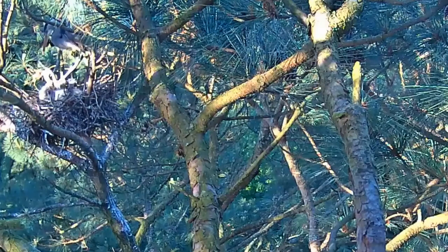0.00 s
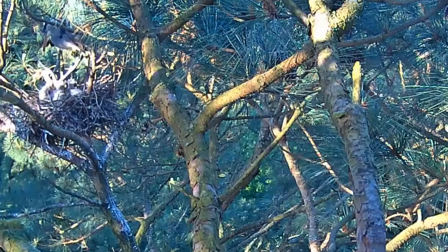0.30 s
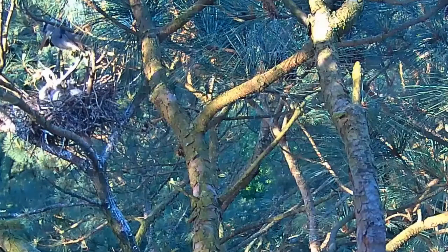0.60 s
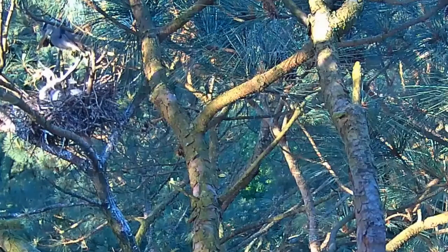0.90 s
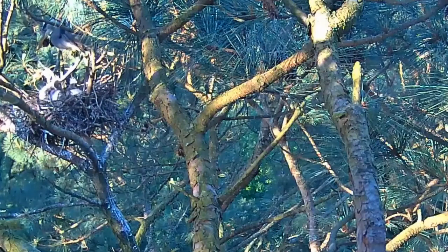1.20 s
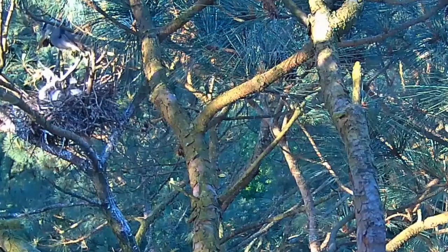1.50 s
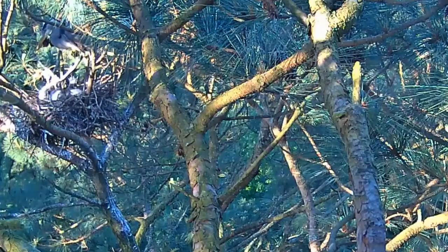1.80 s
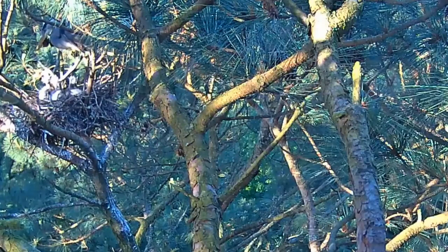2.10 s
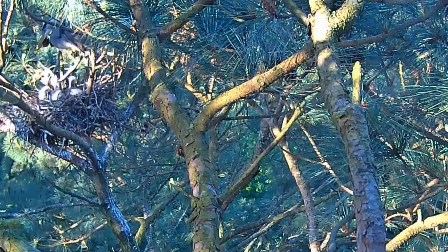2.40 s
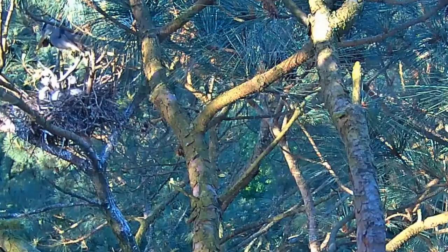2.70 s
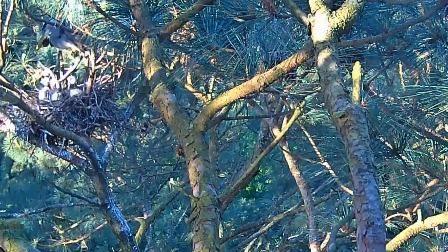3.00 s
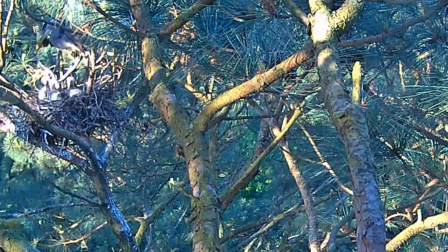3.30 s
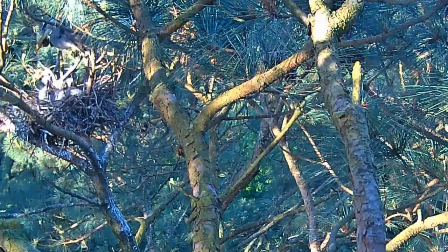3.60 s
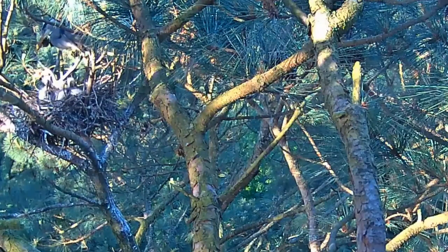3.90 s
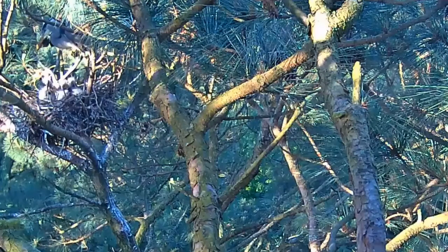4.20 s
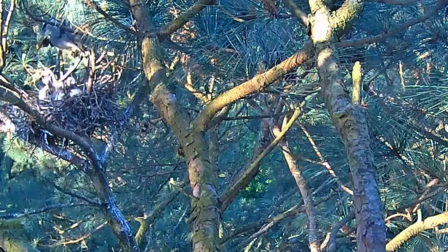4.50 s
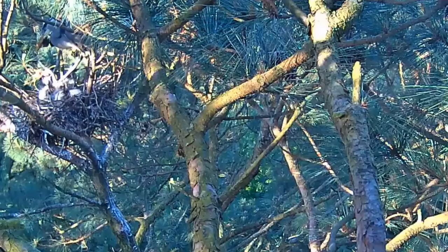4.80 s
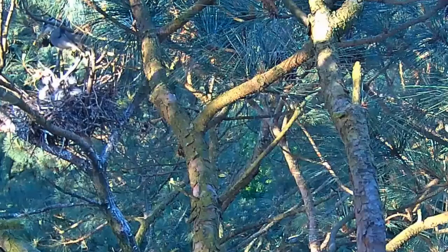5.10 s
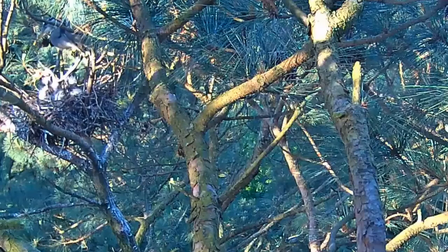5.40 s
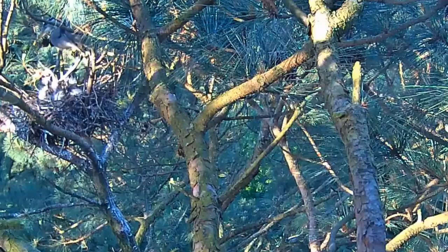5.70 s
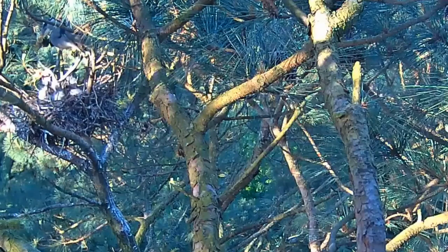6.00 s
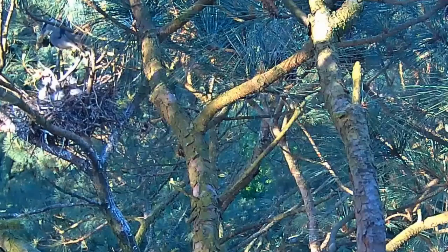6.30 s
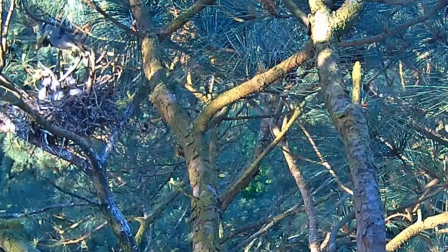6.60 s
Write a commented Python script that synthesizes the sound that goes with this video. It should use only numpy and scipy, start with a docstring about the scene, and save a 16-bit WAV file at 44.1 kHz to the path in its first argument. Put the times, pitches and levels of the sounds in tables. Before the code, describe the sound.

Heron chicks give short, dry clacking calls in loose runs from a nest high in a pine wood, heard from the ground below. A songbird whistles a quick, repeating phrase at the start and again near the end, and in between other birds whistle and chatter faintly from farther off. A steady low hum, distant traffic and soft air in the needles lie underneath.

```python
"""A pine wood, microphone on the ground below a heron nest. High overhead the chicks give short, dry
"kek" calls: rattles of syrinx pulses ringing in the throat. A songbird whistles two phrases of pure
slurs that scatter among the trunks; other birds call from farther off, half lost in their echoes.
Under it all lie distant traffic, one far car passing, an engine and machinery drones, air in the pines
and a low mains hum. The recorder adds faint, glassy high tones to the whistles and a ring to the keks."""
import sys
import numpy as np
from scipy import signal
from scipy.fft import rfft, irfft, next_fast_len
from scipy.io import wavfile
from scipy.ndimage import uniform_filter1d, map_coordinates

SR = 44100
rng = np.random.default_rng(int(sys.argv[2]) if len(sys.argv) > 2 else 0)


def log_audio(samples):
    """Write samples as a 16-bit WAV file to the path given in sys.argv[1]."""
    # one column per channel
    frames = np.atleast_2d(samples).T
    # limit to full scale, then quantise
    limited = np.clip(frames, -1, 1)
    pcm = np.round(limited * 32767).astype(np.int16)
    wavfile.write(sys.argv[1], SR, pcm)


N = 302526

# chick calls overhead: (time [s], nominal length [s], relative level [dB], gape [0 shut, 1 wide])
KEKS = [(0.795, 0.022, -56, .9), (0.976, 0.03, -51, 0.53), (1.19, 0.042, -54, 0.97),
        (1.428, 0.036, -57, 0.67), (2.033, .026, -51, 0.44), (2.238, 0.035, -58.5, 0.48),
        (2.479, 0.04, -52, .65), (2.671, .046, -64, .3), (3.233, .029, -56.5, 0.61),
        (3.432, .037, -59, 0.59), (3.663, .043, -57, .3), (3.909, 0.043, -62.5, 0),
        (4.575, 0.041, -58.5, .4), (4.882, 0.054, -64, 0.05), (5.183, 0.034, -54, .2),
        (6.008, 0.042, -56, 0.22), (6.225, 0.031, -60, 0.03), (6.459, 0.04, -52, 0.22)]
# three throat resonances, bill half open, then the recorder's faint high ring near 6.7 kHz:
# (frequency [Hz], width [Hz])
KEK_PEAKS = [(2020, 690), (2860, 544), (4620, 550), (6720, 400)]
# per peak; an open bill weakens the lowest and frees the third: (gain shut [dB], gain wide [dB])
GAPE_DB = [(1.5, -9), (-2, 1.5), (-19.5, -7.5), (-19, -22.5)]
# the songbird's five slurs: (onset [s], length [s], start [Hz], middle [Hz], end [Hz], gain [dB])
MOTIF = [(.003, 0.056, 2208, 2833, 3010, 1.5), (0.083, 0.025, 3537, 3166, 2880, -0.5),
         (0.115, 0.029, 3000, 3640, 4120, -13), (0.203, 0.0266, 2810, 2493, 2400, -2.5),
         (0.235, 0.044, 2348, 2367, 2430, -6.5)]
# its phrases: (time [s], motif spacing [s], relative level [dB])
PHRASES = [(-.174, .333, -49), (5.637, .3355, -50.5)]
# falling whistles farther off: (time [s], length [s], start pitch [Hz], relative level [dB])
WHISTLES = [(1.384, 0.086, 2664, -59.5), (2.385, .032, 3430, -67.5), (2.418, 0.054, 3037, -57),
            (2.553, 0.039, 2526, -62), (4.863, 0.05, 3290, -60.5), (5.242, 0.044, 2940, -62),
            (6.241, 0.063, 2997, -52)]
# syllables of a distant, raspy chatter: (time [s], pitch [Hz], relative level [dB])
CHATTER = [(1.28, 2950, -60), (1.655, 2630, -58), (1.775, 2604, -57.5), (1.887, 2584, -60.5),
           (5.32, 2580, -63.5)]
# thin, high, distant calls: (time [s], pitch [Hz], relative level [dB])
THIN_CALLS = [(2.091, 4740, -73.5), (2.17, 4000, -78), (2.776, 4630, -83), (6.794, 4700, -74)]
# clumps of trees that throw the song back: (delay [s], gain [dB])
TRUNK_ECHOES = [(.018, -12), (0.037, -13), (0.131, -15)]
# the wood's reverberation: (frequency [Hz], time to fall 60 dB [s])
WOOD_DECAY = [(1000, 0.53), (3000, 1), (8000, 0.74)]
# mains hum: (frequency [Hz], rms level [dB])
HUM = [(60, -46.5), (90, -70), (120, -56.5), (180, -70.5), (300, -71.5), (360, -81.5), (420, -73),
       (540, -78.5)]
# a distant engine: (time [s], pitch [Hz], rms level [dB])
ENGINE = [(0, 68.5, -51), (.9, 70.5, -51.5), (1.6, 68.7, -58), (2.1, 70.6, -53), (2.5, 70.6, -74.5),
          (6.86, 70.3, -61)]
# far machinery: (frequency [Hz], width [Hz], rms level [dB])
DRONES = [(91.9, 6.8, -62), (116.5, 9.5, -63), (230.8, 17, -67.5), (346.6, 9.7, -71.5)]
# swell of road and pine air: (time [s], relative road level [dB], relative air level [dB])
FLOW = [(0.0, -62, -67), (0.76, -65, -66.5), (1.36, -64, -64), (3.55, -62, -63.5), (4.09, -61.5, -66),
        (4.77, -62.5, -65), (5.41, -60.5, -67), (6.25, -63, -64), (6.86, -62.5, -63.5)]
# spectra of rumble, distant tyres, pine air and hiss: (frequency [Hz], relative density [dB])
RUMBLE_SPECTRUM = [(12, -39), (20, 0), (30, -19), (43, -9.5), (77, -7), (134, -23.5), (168, -17),
                   (497, -34), (700, -27.5), (910, -55), (1540, -120)]
ROAD_SPECTRUM = [(300, -4), (550, -5.5), (800, -5), (1020, -1), (1350, -7.5), (1700, -13), (2500, -19.5),
                 (4000, -72)]
AIR_SPECTRUM = [(900, -0.5), (1600, 0.5), (2200, 1), (3000, -2), (3300, -12), (3700, -24), (4300, -34)]
HISS_SPECTRUM = [(2500, 8), (3800, 7.5), (5400, 7.5), (6800, 6.5), (7500, -1), (8300, -7), (9200, 1.5),
                 (10700, -17), (11300, -96)]


def chicks(direct_db=1, branches_db=-3, wood_db=-13, shut_hz=172, open_hz=224, gape_lift=0.036):
    """Nestlings high overhead; a wider bill gives a quicker, brighter rattle. Branches and wood answer."""
    track = np.zeros(N)
    shut_db, open_db = np.transpose(GAPE_DB)
    for s, length, db, gape in KEKS:
        pulse_hz = shut_hz + gape * (open_hz - shut_hz)
        levels_db = db + shut_db + gape * (open_db - shut_db)
        call = kek(length, pulse_hz, levels_db, lift=gape_lift * (gape - .5))
        add(track, s, amp(direct_db) * call)
        add(track, s, amp(branches_db) * blur(call, spread_s=0.013))
        add(track, s, amp(wood_db) * scatter(call, build_s=0.0052))
    return track


def kek(length, pulse_hz, levels_db, lift, jitter=.09, shimmer_db=1.5, rasp=.11, edge_db=-6, spill_db=-8):
    """Syrinx pulses ring three throat resonances and spill between them; the recorder adds a high ring."""
    t = np.arange(SR // 8) / SR
    timing, strength = rng.standard_normal((32, 2)).T
    times = np.cumsum(1 + jitter * timing) / pulse_hz
    onsets = ((times - times[0]) * SR).astype(int)
    pulses = np.bincount(onsets, amp(shimmer_db * strength), len(t))[:len(t)]
    # each pulse drags a short splash of turbulence behind it
    wakes = signal.fftconvolve(pulses, np.exp(-t / 0.0042))[:len(t)]
    splash = rasp * rng.standard_normal(len(t)) * wakes
    # the push of air swells, holds, then lets go quickly
    breath = np.interp(t / length, [0, .2, .75, 1, 1.25], [.55, 1, .8, .45, 0])
    source = (pulses + splash) * breath
    stretch = 1 + lift + .015 * rng.standard_normal()  # the peaks shift a little from call to call

    def band(hz, width, db):
        ring = resonate(source, hz, width)
        return amp(db) * ring / np.sqrt(np.sum(ring ** 2) / (length * SR))

    peaks = sum(band(hz * stretch, width, db) for (hz, width), db in zip(KEK_PEAKS, levels_db))
    spill = band(hz=3600, width=2100, db=np.mean(levels_db) + spill_db)
    edge = band(hz=9200, width=1300, db=levels_db[-1] + edge_db)
    return peaks + spill + edge


def songbird(direct_db=-1, wood_db=-1.5, repeats=4, lead_in_db=-2, last_sag_per_s=0.177):
    """Evenly paced motifs reach the microphone directly, off clumps of trees and as a diffuse tail."""
    track = np.zeros(N)
    for start, period, db in PHRASES:
        for k in range(repeats):
            s = start + k * period
            # a phrase's first motif is softer; its last sags in pitch
            song = amp(db + lead_in_db * (k == 0)) * motif(last_sag_per_s * (k == repeats - 1))
            add(track, s, amp(direct_db) * song)
            add(track, s, amp(wood_db) * scatter(song, build_s=0.0054))
            for delay, echo_db in TRUNK_ECHOES:
                add(track, s + delay, amp(echo_db) * blur(song, spread_s=0.019))
    return track


def motif(sag_per_s, drift=0.0082, flutter_db=2):
    """Pure slurs, each one bend of pitch under an arch of level, a little different each time."""
    song = np.zeros(SR // 3)
    for s, length, start_hz, middle_hz, end_hz, db in MOTIF:
        level = arch(length, power=1.13)
        progress = np.linspace(0, 1, len(level))
        bend = np.polyval(np.polyfit([0, .5, 1], [start_hz, middle_hz, end_hz], 2), progress)
        pitch = bend * (1 - sag_per_s * s + drift * wobble(103, len(level)))
        level *= amp(db + flutter_db * wobble(107, len(level)))
        add(song, s, level * tone(pitch))
    return song


def far_birds(direct_db=-1.5, wood_db=-2):
    """Whistles, chatter and thin calls from deeper in the wood, half lost in their echoes."""
    notes = [(s, db, far_note(length, hz, waver_hz=37, fall=0.0634)) for s, length, hz, db in WHISTLES]
    notes += [(s, db, far_note(0.12, hz, waver_hz=214.5)) for s, hz, db in CHATTER]
    notes += [(s, db, far_note(0.1, hz, waver_hz=100)) for s, hz, db in THIN_CALLS]
    track = np.zeros(N)
    for s, db, note in notes:
        add(track, s, amp(db + direct_db) * note)
        add(track, s, amp(db + wood_db) * scatter(note, build_s=0.0021))
    return track


def far_note(length, hz, waver_hz, fall=0):
    """One wavering note that loses the share `fall` of its pitch; a deep waver makes it raspy."""
    level = arch(length, power=0.33)
    glide = hz * (1 - fall * np.linspace(0, 1, len(level)))
    return level * tone(glide + waver_hz * wobble(150, len(level)))


def blur(x, spread_s):
    """Many close reflections off branches or trunks smear a sound."""
    t = np.arange(SR // 16) / SR
    paths = rng.standard_normal(len(t)) * np.exp(-t / spread_s)
    return signal.fftconvolve(x, paths / np.linalg.norm(paths))


def scatter(x, build_s):
    """The diffuse answer of the pine wood; it builds up, then dies band by band."""
    hz, t, bands = signal.stft(rng.standard_normal(SR), SR, nperseg=256)
    shape = amp(-60 * t / along(WOOD_DECAY, hz)[:, None]) * (1 - np.exp(-t / build_s))
    tail = signal.istft(bands * shape, SR, nperseg=256)[1]
    return signal.fftconvolve(x, tail / np.linalg.norm(tail))


def recorder_images(song, spacing_hz=3910, first_db=-25, second_db=-35, mirror_db=-31, sizzle_db=-33):
    analytic = signal.hilbert(song)
    shift = np.exp(2j * np.pi * spacing_hz * np.arange(N) / SR)
    parallel = analytic * (amp(first_db) * shift + amp(second_db) * shift ** 2)
    mirrored = amp(mirror_db) * np.conj(analytic) * shift ** 2 * (1 + shift)  # falls as the song rises
    sizzle = amp(sizzle_db) * np.abs(analytic) * noise_band(hz=7200, width=5000)
    return np.real(parallel + mirrored) + sizzle


def mains_hum(waver_db=.5, drift_rad=0.13):
    """Low mains tones, each wavering slightly in level and phase."""
    t = np.arange(N) / SR
    hum = np.zeros(N)
    for hz, db in HUM:
        level = amp(db + waver_db * wobble(3.03))
        phase = 2 * np.pi * (hz * t + rng.random()) + drift_rad * wobble(1.1)
        hum += np.sqrt(2) * level * np.sin(phase)
    return hum


def far_machines():
    """A distant engine beats against the hum, fades and creeps back, over narrow machinery drones."""
    engine_hz, engine_db = curves(ENGINE)
    drones = sum(amp(db) * noise_band(hz, width) for hz, width, db in DRONES)
    return amp(engine_db) * tone(engine_hz) + drones


def traffic(level_db, rumble_db=-57, road_db=3.5):
    """Low rumble and the wash of tyres on a distant road."""
    rumble = amp(rumble_db + 0.4 * wobble(2)) * rush(RUMBLE_SPECTRUM, patchy_db=1.2)
    return rumble + amp(level_db + road_db) * rush(ROAD_SPECTRUM, patchy_db=1.5)


def passing_car(nearest_s=1.88, pass_s=0.56, nearest_db=-63.5):
    """One far car's tyre whine swells and fades with its distance from the microphone."""
    distance = np.hypot(1, (np.arange(N) / SR - nearest_s) / pass_s)  # 1 at the nearest point
    return amp(nearest_db) / distance * noise_band(hz=1280, width=280)


def pine_air(level_db, air_db=4, hiss_db=-78):
    """Air moving in the needles, over a faint, even hiss."""
    air = amp(level_db + air_db) * rush(AIR_SPECTRUM, patchy_db=1.2)
    return air + amp(hiss_db) * rush(HISS_SPECTRUM, patchy_db=.8)


def rush(spectrum, patchy_db):
    """Coloured noise of rms 1 with patches of random gain."""
    bands = signal.stft(rng.standard_normal(N), nperseg=1024)[2]
    patches = uniform_filter1d(rng.standard_normal(bands.shape), size=5, axis=0)
    patches = uniform_filter1d(patches, size=10, axis=1)
    noise = signal.istft(bands * amp(patchy_db * unit(patches)), nperseg=1024)[1][:N]
    return unit(filtered(noise, lambda hz: amp(along(spectrum, hz))))


def noise_band(hz, width):
    """A band of noise at rms 1."""
    return unit(resonate(rng.standard_normal(N), hz, width))


def tone(pitch):
    """A sine of rms 1 that follows a pitch curve in Hz."""
    return np.sqrt(2) * np.sin(2 * np.pi * np.cumsum(pitch) / SR)


def arch(length, power):
    """An envelope that swells and fades over one note."""
    return np.abs(np.sin(np.linspace(0, np.pi, int(length * SR)))) ** power


def wobble(rate, size=N):
    """A smooth random curve, rate knots a second."""
    knots = rng.standard_normal(int(size * rate / SR) + 4)
    return map_coordinates(knots, [np.arange(size) * rate / SR])


def resonate(x, hz, width):
    """A steep-sided resonance."""
    edges = np.clip([hz - width / 2, hz + width / 2], 10, SR / 2 - 10)
    return signal.sosfilt(signal.butter(2, edges, "bandpass", fs=SR, output="sos"), x)


def filtered(x, response):
    """x shaped by a frequency response."""
    size = next_fast_len(len(x) + SR // 2)
    return irfft(rfft(x, size) * response(np.fft.rfftfreq(size, 1 / SR)), size)[:len(x)]


def along(points, hz):
    """(Hz, value) points read on a log axis."""
    freqs, values = np.transpose(points)
    return np.interp(np.log(hz + 1), np.log(freqs + 1), values)


def curves(rows):
    """One value per sample for each column after the time."""
    s, *columns = np.transpose(rows)
    return [np.interp(np.arange(N) / SR, s, column) for column in columns]


def add(track, s, sound):
    """Mix a sound into a track at time s."""
    start = round(s * SR)
    part = sound[max(-start, 0):max(len(track) - start, 0)]
    track[max(start, 0):][:len(part)] += part


def amp(db):
    """Decibels to gain."""
    return 10 ** (np.asarray(db) / 20)


def unit(x):
    """x at rms 1."""
    return x / np.sqrt(np.mean(x ** 2) + 1e-20)


def scene():
    """Everything at one microphone on the ground below the nest, with the recorder's high tones."""
    road_db, air_db = curves(FLOW)
    song = songbird() + far_birds()
    birds = chicks() + song
    images = recorder_images(song)
    background = mains_hum() + far_machines() + traffic(road_db) + passing_car() + pine_air(air_db)
    return (birds + images + background)[None]


def record(dry):
    """The camera's microphone channel adds a constant offset and keeps nothing above its band limit."""
    top_hz, offset = 11200, .0164
    return filtered(dry[0], lambda hz: hz < top_hz)[None] + offset


dry = scene()
out = record(dry)
log_audio(out)
```